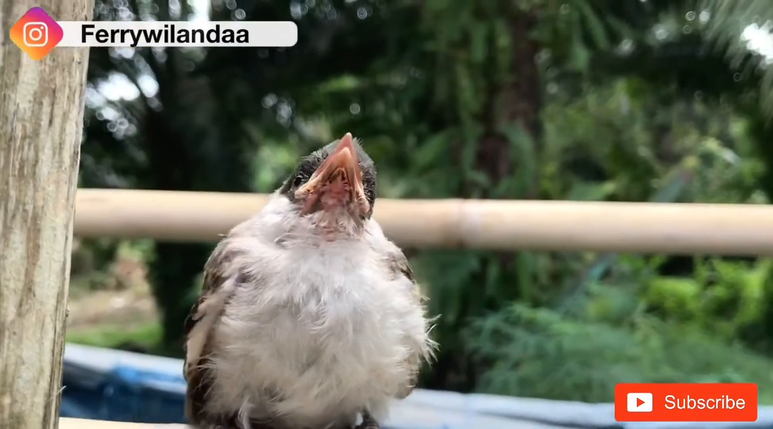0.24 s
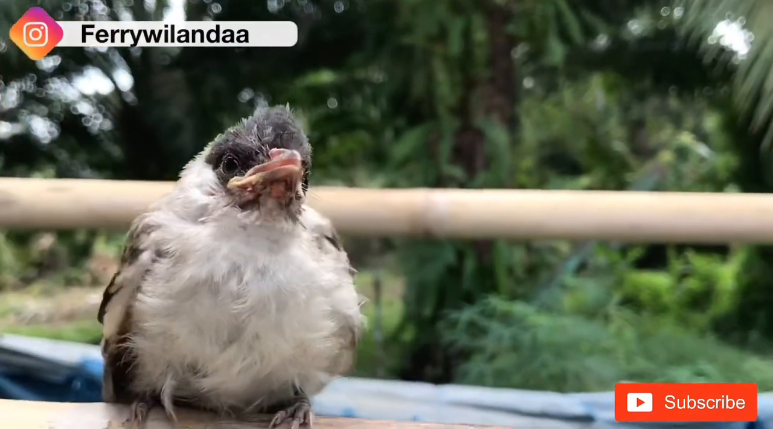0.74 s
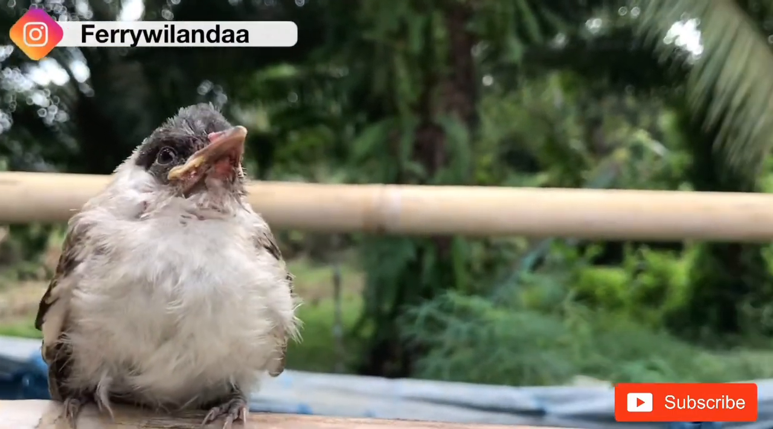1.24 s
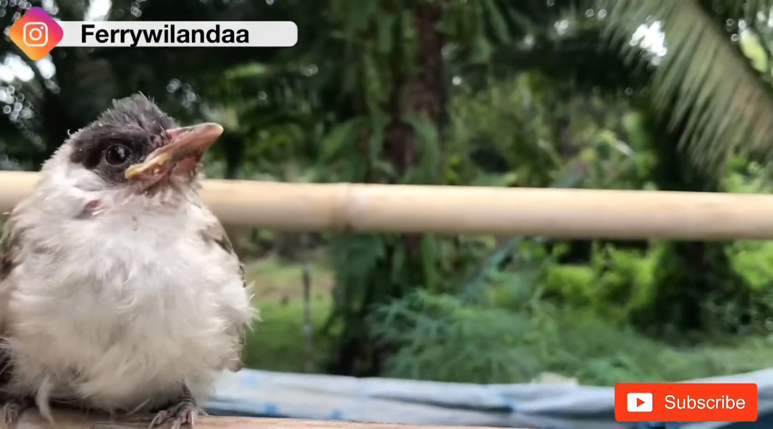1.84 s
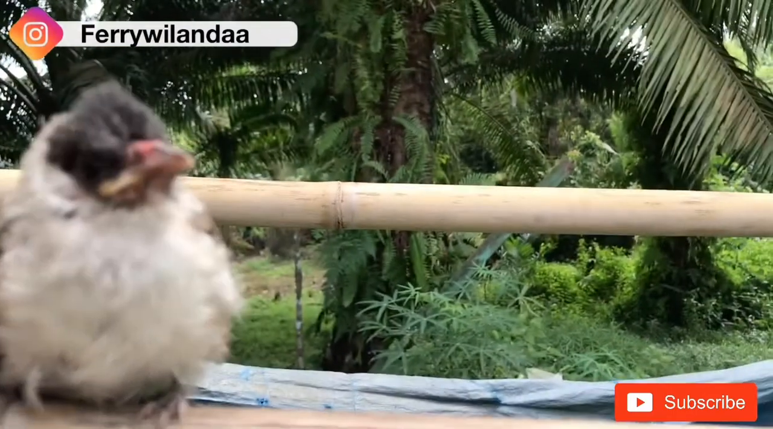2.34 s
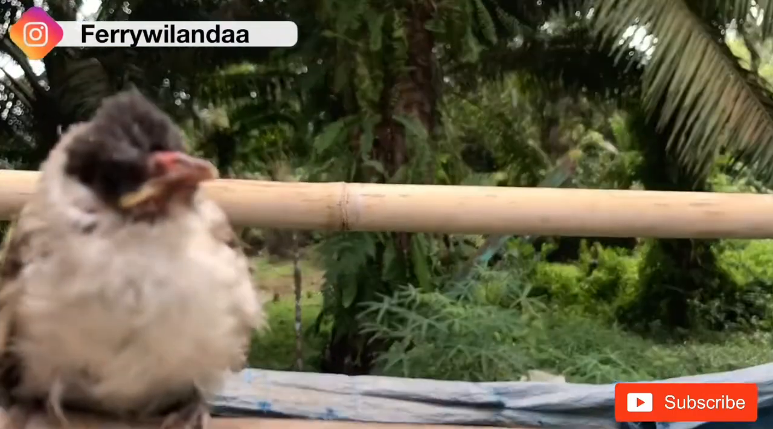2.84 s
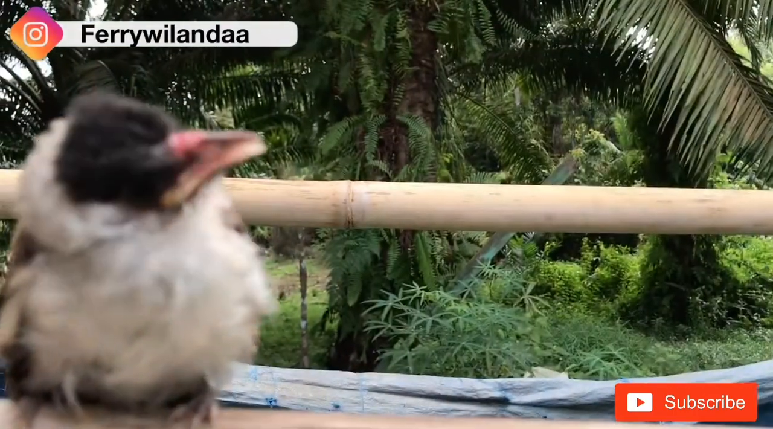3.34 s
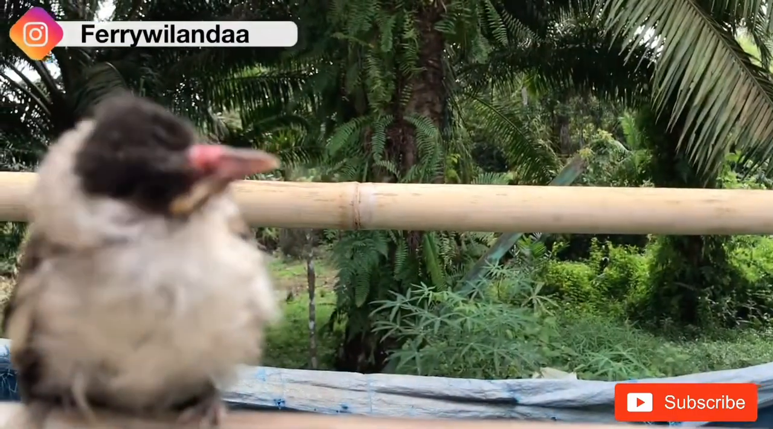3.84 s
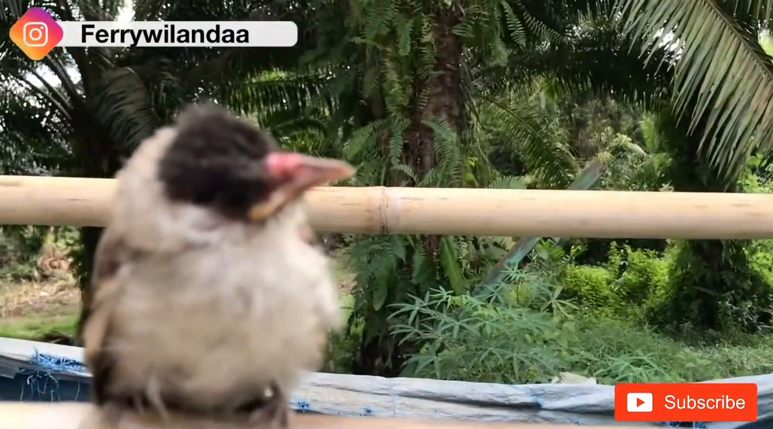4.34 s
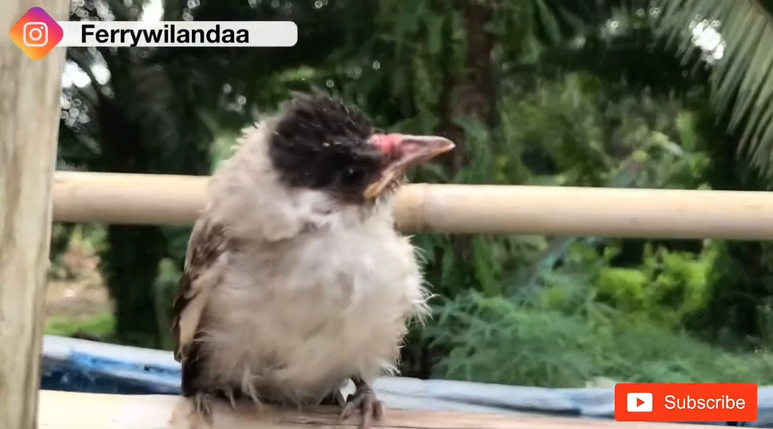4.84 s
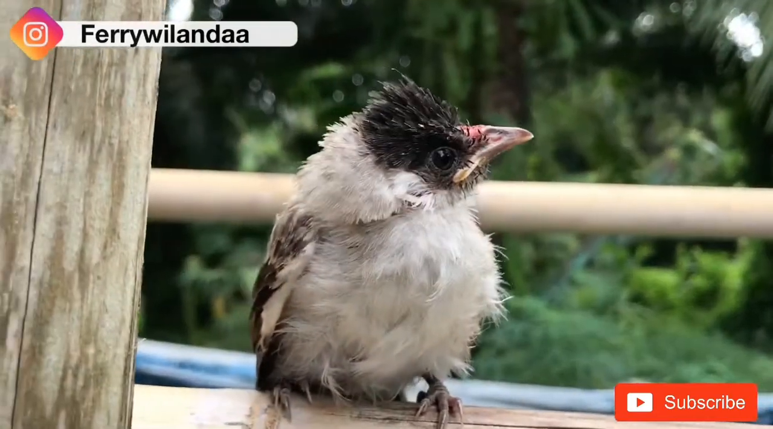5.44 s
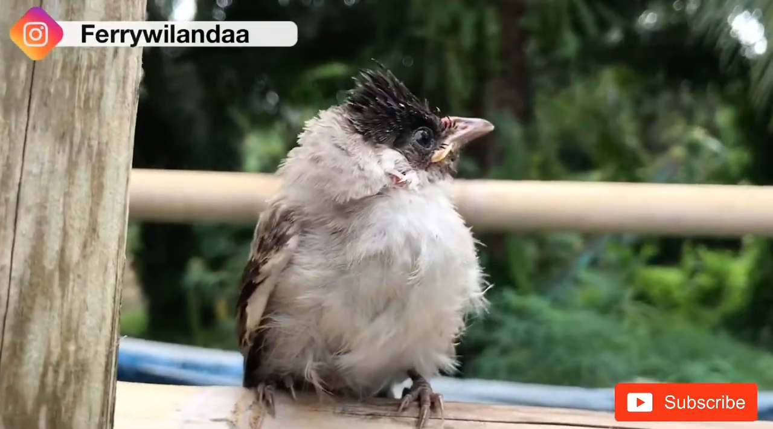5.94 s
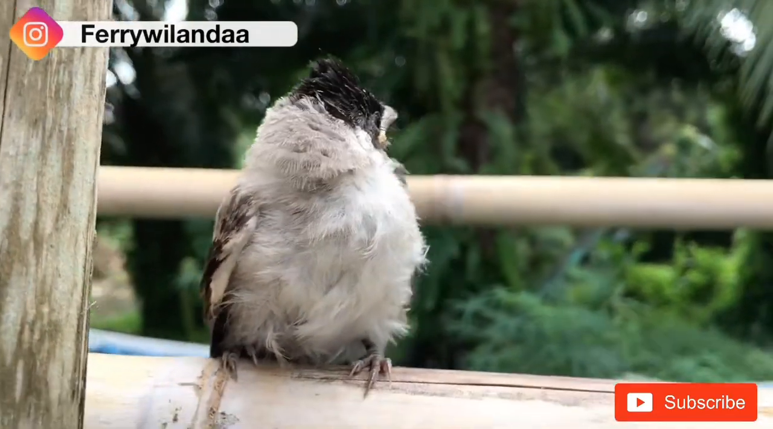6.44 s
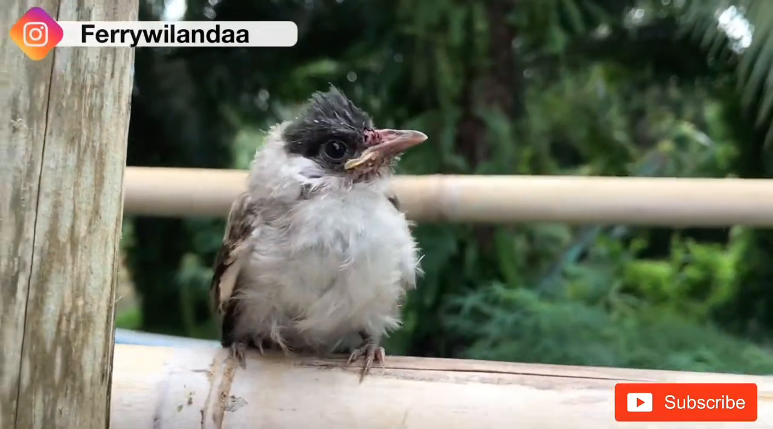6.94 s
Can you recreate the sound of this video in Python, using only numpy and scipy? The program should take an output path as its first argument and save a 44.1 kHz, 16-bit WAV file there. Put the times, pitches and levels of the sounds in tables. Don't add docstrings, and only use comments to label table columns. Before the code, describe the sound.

A close, dry recording of a fledgling: bright clean cheeps stand far above a quiet background, first a pair, another pair, then single calls spaced over half a second apart, a late pair, and two last singles. The paired second notes are rougher and trilled. Behind lie distant traffic rumble, surging low engine drone, cricket and katydid shimmer, small far bird whistles and light scuffs on wood, with almost no echo.

```python
import sys
import numpy as np
from scipy import signal
from scipy.fft import rfft, irfft, next_fast_len
from scipy.io import wavfile
from scipy.ndimage import uniform_filter1d

SR = 44100
rng = np.random.default_rng(int(sys.argv[2]) if len(sys.argv) > 2 else 0)


def volts(x):
    e = np.asarray(x, float) / 20
    return 10 ** e


def inscribe(sig):
    pcm = np.round(np.clip(np.atleast_2d(sig).T, -1, 1) * 32767)
    wavfile.write(sys.argv[1], SR, pcm.astype(np.int16))


N = 317079
TIME = np.arange(N) / SR
PADDED = next_fast_len(N, True)

# [f/Hz, density/dB per Hz]
AIR_SPECTRUM = [(240, -33.5), (400, -2.5), (1330, -14), (3810, -18), (4310, -18), (5030, -21.5),
                (7060, -18.5), (7750, -25), (9610, -19.5), (10500, -27), (16000, -25)]
# [f/Hz, density/dB per Hz]
TRAFFIC_SPECTRUM = [(20, -19), (35, -8), (52, -0.5), (80, -6), (170, -5.5), (330, -11.5), (420, -21),
                    (700, -33)]
# [t/s, level/dB]
RUMBLE_LEVEL = [(0.0, -47.5), (.7, -50.5), (2.0, -47), (3.6, -51.5), (5.5, -51), (7.19, -50)]
# [middle t/s, half length/s, level/dB]
TYRE_WHINE = [(1.1, 2.7, -72), (3.7, 1.8, -65.5), (7.0, 0.88, -72)]
# [middle t/s, half length/s, level/dB]
LOW_ENGINE = [(.2, 0.064, -47), (1.25, 0.1, -42.5), (1.95, 0.13, -39), (2.48, 0.034, -38.5),
              (2.78, 0.17, -40), (3.22, 0.094, -40.5), (3.7, 0.23, -38), (4.2, 0.17, -44.5),
              (4.52, 0.16, -39), (5.1, 0.1, -48), (5.8, 0.43, -70), (7.1, 0.19, -50.5)]
# [t/s, f/Hz, level/dB]
SECOND_ENGINE = [(0.0, 126, -46), (1.05, 126, -47), (1.249, 143, -47), (2.0, 145, -39.5), (3.05, 143, -53),
                 (3.2, 120, -50), (3.9, 120, -48.5), (4.05, 145, -45), (4.7, 146, -56), (4.9, 127, -49.5),
                 (6.5, 125, -60), (6.9, 150, -66), (7.19, 152, -39.5)]
# [middle t/s, half length/s, level/dB]
HIGH_ENGINE = [(.2, 0.58, -55.5), (1.15, 0.34, -50.5), (2.0, 0.44, -48.5), (3.1, 0.24, -58),
               (4.4, 0.31, -59.5), (6.25, 0.44, -54)]
# [f/Hz, width/Hz, level/dB, pulses/s, groups/s]
INSECT_CHOIRS = [(6611, 250, -80, 69, 2.5), (6822, 400, -79, -0.5, 0), (4300, 150, -87.5, 1, -3),
                 (8234, 500, -82.5, 55.5, 1), (9664, 250, -81, 79.5, 22), (11320, 600, -79.5, 0.5, 0)]
# [middle t/s, half length/s, level/dB]
KATYDID_SWELLS = [(1.2,0.9,-76.5),(2.75,.3,-71.5),(4.5,0.63,-72),(6.2,0.51,-69.5)]
# [f/Hz, level/dB]
CRICKET_STROKES = [(7000,-67),(7170,-65),(7230,-65)]
# [t/s, lag/bars]
CRICKET_DRAG = [(0,-.5),(2.2,.2),(4.3,.87),(4.8,1),(5.4,1),(6,1.35),(7.2,1.75)]
# [middle t/s, half length/s, level/dB]
SMEARED_CALL = [(5.255, .025, -72.5), (5.285, 0.033, -58.5)]
# [t/s, length/s, start f/Hz, end f/Hz, level/dB]
FAR_GLIDES = [(1.23, 0.09, 4090, 4280, -62.5), (2.113, 0.027, 2150, 1445, -62),
              (2.133, 0.031, 2100, 2570, -53.5), (2.204, 0.03, 2400, 1490, -54),
              (2.229, 0.036, 2175, 2660, -53), (2.23, 0.05, 2950, 2900, -62), (2.28, 0.04, 2900, 2950, -61),
              (2.301, 0.025, 3250, 3350, -56), (2.39, .012, 3000, 2700, -52), (2.4, .02, 3850, 3900, -55),
              (2.64, .04, 3000, 3060, -66), (2.858, 0.038, 2950, 3140, -62),
              (2.385, 0.0043, 3900, 2900, -41), (5.034, 0.014, 4500, 4120, -63),
              (5.037, 0.035, 4200, 4150, -58), (5.255, 0.031, 6310, 5500, -67.5),
              (5.27, 0.022, 5650, 5150, -61), (5.28, 0.032, 5180, 5100, -60.5),
              (5.309, 0.072, 5150, 5100, -55.5), (7.014, 0.02, 3330, 3036, -57.5),
              (7.044, 0.019, 2250, 1860, -56.5), (7.061, 0.016, 1900, 2250, -62),
              (7.122, .014, 2900, 2410, -62), (7.136, 0.024, 2200, 1840, -58),
              (7.158, 0.029, 2200, 2150, -56)]
# [t/s, f/Hz, level/dB]
FAR_REPEATS = [(2.27, 2390, -65), (2.39, 2420, -56), (2.455, 2380, -57), (2.65, 2310, -59.5),
               (2.72, 2320, -64), (2.795, 2390, -56), (2.88, 2430, -57), (2.99, 2420, -59.5),
               (3.0, 2270, -65), (3.065, 2495, -57.5), (3.11, 2470, -63), (3.18, 2350, -60),
               (3.32, 2430, -64), (3.41, 2294, -62.5), (3.49, 2350, -68), (3.54, 2420, -67),
               (3.61, 2310, -60.5), (3.7, 2330, -65.5), (3.83, 2280, -60.5), (3.95, 2320, -66),
               (4.05, 2322, -58), (4.15, 2310, -63), (4.28, 2260, -61), (4.35, 2210, -61.5),
               (5.14, 2310, -67), (6.955, 2320, -61.5), (7.06, 2365, -62)]
# [middle t/s, half length/s, level/dB]
FAR_THREAD = [(3.3, 1, -68.5), (5.16, 0.061, -67), (7.1, 0.12, -70)]
# [t/s, rise/s, fall/s, centre f/Hz, level/dB]
RAIL_RUSTLES = [(.26, 0.0018, 0.013, 2150, -53), (.27, 0.012, 0.038, 801, -50.5),
                (1.11, 0.0016, 0.0092, 3935, -53.5), (1.769, 0.00112, 0.083, 888, -44),
                (1.776, 0.00433, 0.12, 2638, -55), (1.861, 0.038, 0.072, 3510, -50.5),
                (1.88, 0.0338, 0.056, 8410, -52), (2.224, .002, .01, 3500, -60),
                (2.3, 0.0019, 0.17, 3454, -60), (2.33, .02, 0.022, 3500, -65.5),
                (1.19, 0.021, 0.035, 3500, -57), (1.82, .005, .02, 4500, -60.5),
                (2.34, 0.0022, 0.013, 8040, -56), (2.386, 0.0012, 0.012, 4967, -54.5),
                (2.42, 0.016, 0.081, 5433, -56.5), (3.53, 0.011, 0.064, 4950, -60),
                (4.071, 0.0054, .02, 7935, -60), (4.131, 0.024, 0.09, 5955, -56.5),
                (4.38, 0.00188, 0.0114, 4415, -52.5), (5.908, 0.0019, 0.0089, 4000, -55)]
# [t/s, start f/Hz, level/dB, octave over it/dB, length/s]
SYRINX_CATCHES = [(0.492, 3100, -27.5, -19.5, 0.012), (0.6933, 3160, -26.5, -1, 0.012),
                  (1.3279, 3630, -23.5, -32.5, 0.012), (1.4967, 3090, -28, 8, 0.004),
                  (2.487, 3690, -29.5, -26, 0.013), (3.2455, 3400, -28.5, -14, 0.0115),
                  (3.868, 3160, -30, -21, 0.014), (4.6635, 3160, -29, -24, 0.011),
                  (5.4375, 3140, -30.5, -21.5, 0.014), (5.5675, 3150, -26.5, 2, 0.0056),
                  (6.297, 3130, -33, -15, 0.01), (6.711, 3350, -32, -27, 0.014)]
# [t/s, length/s, plateau f/Hz, closing f/Hz, 2nd partial level/dB]
CALLS = [(0.504, 0.068, 1476, 1618, -19.5), (0.702, 0.07, 1335, 1281, -23), (1.34, 0.064, 1549, 1772, -19),
         (1.503, 0.07, 1319, 1269, -24), (2.502, 0.064, 1594, 1882, -16), (3.257, 0.069, 1492, 1625, -19.5),
         (3.881, 0.065, 1532, 1702, -19), (4.676, 0.073, 1498, 1599, -20), (5.45, 0.071, 1475, 1649, -21.5),
         (5.574, 0.06, 1298, 1265, -23), (6.308, 0.068, 1410, 1622, -22.5), (6.725, 0.068, 1612, 1726, -19)]
# [4th partial early/dB, 4th late/dB, upper partials/dB]
CALL_BEAKS = [(1, 13.5, -24), (5.5, 3.5, -11.5), (4, 3, -19.5), (13.5, 12, -11), (-3.5, -10.5, -26),
              (5.5, 4.5, -21), (2.5, 0, -22.5), (5, 9, -18.5), (2, 4, -19), (5.5, 1, -13), (-3, -6.5, -24),
              (-2, 4.5, -22)]
# [slide-up share, overshoot share, climb start/s, climb stop before the end/s]
CALL_BENDS = [(0.11, .005, 0.018, 0.018), (0.06, 0.0099, 0.008, 0.02), (0.07, 0.039, .024, 0.0066),
              (0.07, 0.0078, 0.03, .012), (0.098, .03, 0.01413, 0.0035), (.14, 0.017, .024, 0.02),
              (0.14, 0.024, 0.022, 0.0091), (0.15, 0.018, .016, 0.0075), (0.11, 0.012, 0.023, 0.0088),
              (.06, 0.01, .016, .008), (0.13, 0.048, 0.02, .008), (0.11, .03, 0.03, 0.0073)]
# [swell/dB, release/dB, loss as the beak opens/dB]
CALL_BREATHS = [(0.2,-2.5,2.5),(-0.5,-1.5,15.5),(1.5,2,-1.4),(1.4,1.1,16),(-0.1,1,4.5),(0.5,-0.5,-3),(0.8,8.5,14),(-2.5,4,7),(-0.1,5,2),(-1.8,6,6),(0.5,4.5,-5.54),(-2,-0.5,12)]
# [t/s, rise/Hz, width/ms]
TRILL_FLICKS = [(0.7127, 41, 2.1), (0.7209, 126, 1.4), (0.7252, -46, 0.9), (0.7276, 136, 1.7),
                (0.7337, 116, 1.3), (0.7399, 195, 1.7), (0.7468, 142, 1.4), (0.7536, 189, 1.4),
                (0.7606, -37, 2.2), (0.77, 60, 1.6), (1.5125, 59, 0.9), (1.5174, 190, 1.5),
                (1.5231, 331, 1.5), (1.53, 293, 1.5), (1.5345, -86, 0.9), (1.5365, 181, 1.8),
                (1.5435, 241, 1.4), (1.5504, 367, 1.6), (1.5576, 236, 1.5), (1.5622, -34, 1.0),
                (1.5693, 272, 2.2), (5.5802, 102, 2.1), (5.5846, 272, 1.3), (5.5908, 400, 1.5),
                (5.5974, 400, 1.4), (5.602, -65, 0.9), (5.6058, 262, 1.2), (5.6117, 384, 1.4),
                (5.6165, -148, 1.0), (5.6206, 356, 2.0), (5.6224, -200, 1.7)]
# [t/s, rise/Hz, width/ms]
PITCH_WAVERS = [(0.5064, 36, 0.9), (0.5212, 13, 3.5), (0.531, -11, 2.6), (0.548, 13, 4.0),
                (0.5657, -17, 1.2), (0.575, 69, 3.6), (1.3411, -44, 0.9), (1.3454, -33, 1.1),
                (1.355, -33, 1.4), (1.364, 30, 0.9), (1.3794, 51, 1.9), (1.3914, 28, 1.7), (1.402, 35, 1.5),
                (2.5128, 191, 2.7), (2.5135, -126, 1.4), (2.5219, 85, 1.1), (2.5265, 45, 1.0),
                (2.5322, 102, 1.1), (2.5441, 91, 1.1), (2.558, 35, 1.5), (3.2599, 31, 0.9),
                (3.268, 29, 0.9), (3.2768, 22, 1.3), (3.2936, 21, 1.4), (3.3046, -23, 1.5),
                (3.3139, 15, 2.3), (3.8903, 66, 0.9), (3.8948, 44, 0.9), (3.9007, 90, 1.1),
                (3.9042, -33, 0.9), (3.9167, 74, 1.1), (3.9228, 35, 0.9), (3.929, 30, 1.2),
                (4.6803, 21, 1.5), (4.6866, -14, 4.0), (4.6871, 40, 0.9), (4.696, 32, 1.0),
                (4.7001, -18, 4.0), (4.7102, -11, 1.4), (5.4573, -29, 1.5), (5.4628, -21, 0.9),
                (5.4827, -18, 3.4), (5.4935, 14, 1.0), (5.5109, -18, 2.6), (6.3181, -50, 1.8),
                (6.3259, 27, 2.3), (6.3456, 38, 1.1), (6.3507, 67, 1.9), (6.3672, -35, 0.9),
                (6.3725, 57, 1.4), (6.7275, -25, 3.5), (6.7332, 64, 2.0), (6.7394, -43, 0.9),
                (6.7508, -23, 0.9), (6.7578, 19, 1.8), (6.7678, -14, 4.0), (6.789, 35, 1.4)]
# [t/s, level/dB, width/ms]
BREATH_PUSHES = [(.555, -2, 5), (.74, 1.5, 2.5), (.754, -1, 4.2), (1.36, -0.5, 2), (1.385, 0, 4.7),
                 (1.518, 1, 2), (1.537, -2, 2), (1.565, -3, 3.4), (2.525, -1, 1.3), (2.545, 0.5, 4),
                 (3.27, 0, 4), (3.91, 0.5, 4), (3.918, 1, 1.5), (4.72, 0.5, 5.2), (5.485, 1, 5),
                 (5.585, 2, 2.1), (5.598, 0, 1.8), (5.62, -1, 2.7), (6.33, 0.5, 5.6), (6.348, 1.5, 4),
                 (6.735, 0.5, 3.7)]
# [multiple, level under the 2nd/dB, gain per 200 Hz of pitch/dB]
ODD_PARTIALS = [(1, -22.5, -0.5), (3, -24, 5.5)]
# [multiple, level in the group/dB]
UPPER_PARTIALS = [(5, -11.5), (6, -3), (7, -8), (8, -2), (9, -17), (10, -10.5), (11, -18)]
# [f/Hz, width/Hz]
VOCAL_RESONANCES = [
    (3200, 2600),
    (6050, 1500),
]
# [f/Hz, level/dB]
OPEN_BEAK = [(6500, 6.5), (8000, 1.5), (9500, -2.5), (10500, -7), (12000, 3), (13200, -7.5), (14500, -6.5),
             (15600, 1.5), (17000, -1)]

SCOOP_S = .013
ATTACK_S, ATTACK_DB, SWELL_DB, RELEASE_S, RELEASE_DB = 0.015, 8.5, 0.7, .02, 15.5
OPEN_S, OPEN_DB, SHUT_S, SHUT_DB = .017, 25, 0.03, 10


def rms_one(x):
    return x / np.sqrt(np.mean(x ** 2) + 1e-20)


def drift(rate):
    r = np.exp(-2 * np.pi * rate / SR)
    return rms_one(signal.lfilter([1], [1, -2 * r, r * r], rng.standard_normal(N + SR))[SR:])


def coloured(spectrum):
    hz, db = np.transpose(spectrum)
    grid = np.arange(PADDED // 2 + 1) * SR / PADDED + 1
    gain = volts(np.interp(np.log(grid), np.log(hz), db, left=-70, right=-70))
    return rms_one(irfft(rfft(rng.standard_normal(PADDED)) * gain, PADDED)[:N])


def narrow(hz, width_hz):
    r = np.exp(-np.pi * width_hz / SR)
    a = [1, -2 * r * np.cos(2 * np.pi * hz / SR), r * r]
    once = signal.lfilter([1, 0, -1], a, rng.standard_normal(N))
    return rms_one(signal.lfilter([1, 0, -1], a, once))


def resonance(hz, centre_hz, width_hz):
    return 1 / np.sqrt(1 + (2 * (hz - centre_hz) / width_hz) ** 2)


def hum(hz, waver_hz):
    return np.sqrt(2) * np.sin(2 * np.pi * np.cumsum(hz + waver_hz * drift(4)) / SR)


def surges(rows, steep):
    return sum(volts(db) * np.exp(-np.abs((TIME - s) / half) ** steep) for s, half, db in rows)


def bumps(rows):
    out = np.zeros(N)
    for s, height, width_ms in rows:
        at = slice(round((s - .015) * SR), round((s + .015) * SR))
        out[at] += height * np.exp(-.5 * (1000 * (TIME[at] - s) / width_ms) ** 2)
    return out


def ramp(t, length):
    return np.clip(1 - t / length, 0, 1) ** 2


def air():
    return volts(-57) * coloured(AIR_SPECTRUM)


def traffic():
    rumble = volts(np.interp(TIME, *np.transpose(RUMBLE_LEVEL)) + 5.0) * coloured(TRAFFIC_SPECTRUM)
    return rumble + volts(-3.5) * surges(TYRE_WHINE, steep=4.3) * narrow(965, 160)


def engines():
    s, second_hz, second_db = np.transpose(SECOND_ENGINE)
    low = volts(-4.0) * surges(LOW_ENGINE, steep=3.9) * hum(102, 3.32)
    second = volts(np.interp(TIME, s, second_db) - 3.5) * hum(np.interp(TIME, s, second_hz), 2.5)
    upper = narrow(334, 13.0) + 0.84 * narrow(303.5, 3.0) + .5 * narrow(352, 6.1)
    return low + second + volts(-0.5) * surges(HIGH_ENGINE, steep=3.2) * upper


def insects():
    out = np.zeros(N)
    for hz, width_hz, db, pulses, groups in INSECT_CHOIRS:
        pulse = (1.0 + np.sin(2 * np.pi * pulses * TIME + .5 * drift(3))) ** (2 if pulses else 0)
        group = 1 + .9 * np.sin(2 * np.pi * groups * TIME + 1.4)
        out += volts(db + 0.3 * drift(1.0)) * rms_one(pulse * group) * narrow(hz, width_hz)
    return out


def katydid():
    return surges(KATYDID_SWELLS, steep=3.0) * narrow(4330, 130)


def cricket():
    bars_per_s, stroke_s, stroke_width_s = 19.4, .0118, .0022
    bar = bars_per_s * TIME - np.interp(TIME, *np.transpose(CRICKET_DRAG))
    beat_s = ((bar + .5) % 1 - .5) / bars_per_s
    turns = np.cumsum(1 + .012 * drift(30)) / SR
    strokes = np.zeros(N)
    for k, (hz, db) in enumerate(CRICKET_STROKES):
        shape = np.exp(-.5 * ((beat_s - (k - 1) * stroke_s) / stroke_width_s) ** 2)
        strokes += volts(db) * shape * np.sin(2 * np.pi * hz * turns)
    return volts(3 + 1.5 * drift(15)) * strokes


def smeared_call():
    return surges(SMEARED_CALL, steep=2.5) * narrow(5900, 1300)


def far_birds():
    out, blur, warble = np.zeros(N), .85 + .3 * drift(90), 1 + .007 * drift(25)
    repeats = [(s, 0.048, hz, hz - 50, db) for s, hz, db in FAR_REPEATS]
    for s, length, start_hz, end_hz, db in FAR_GLIDES + repeats:
        at = slice(round(s * SR), round((s + length) * SR))
        part = (TIME[at] - s) / length
        hz = (start_hz + (end_hz - start_hz) * part) * warble[at]
        whistle = np.sin(2 * np.pi * np.cumsum(hz) / SR)
        out[at] += np.sqrt(2) * volts(db) * np.sin(np.pi * np.clip(part, 0, 1)) * whistle
    thread = surges(FAR_THREAD, steep=3.2) * volts(1.4 * drift(27)) * narrow(2306, 300)
    return out * blur + thread


def garden(x):
    t60_s = 0.23
    t = TIME[:SR // 2]
    tail = rng.standard_normal(len(t)) * volts(-60 * t / t60_s) * np.clip(t / 0.0053, 0, 1)
    tail = signal.lfilter([1], [1, -.4], tail)
    return signal.fftconvolve(x, tail / np.sqrt(np.sum(tail ** 2)))[:N]


def rustles():
    out, grain = np.zeros(N), rng.standard_normal(N) * volts(1.7 * drift(150))
    for s, rise, fall, hz, db in RAIL_RUSTLES:
        at = slice(max(round((s - .2) * SR), 0), round((s + 0.58) * SR))
        t = TIME[at] - s
        shape = np.where(t < 0, np.exp(-(t / rise) ** 2), np.exp(-np.abs(t) / fall))
        band = signal.butter(2, [hz / 2.3, min(hz * 1.9, .45 * SR)], "band", fs=SR)
        out[at] += volts(db) * shape * rms_one(signal.lfilter(*band, grain[at]))
    return out


def catches():
    out, rasp = np.zeros(N), narrow(3010, 2000) + 0.28 * narrow(6006, 2300)
    for s, start_hz, db, octave_db, length in SYRINX_CATCHES:
        at = slice(round(s * SR), round((s + 2.3 * length) * SR))
        t = TIME[at] - s - .002
        part = np.clip(t / (1.1 * length), 0, 1)
        phase = 2 * np.pi * np.cumsum(start_hz - 650 * part) / SR
        stutter = .65 - 0.46 * np.cos(2 * np.pi * t / 0.0041)
        tone = np.sin(phase) + volts(octave_db) * np.sin(2 * phase)
        blip = tone * (1 - part) ** 2.5 * stutter
        out[at] += volts(db) * np.sin(np.pi * part ** 0.96) * (2.4 * blip + 0.8 * part * rasp[at])
    return out


def gesture(t, call, mouth, bend, push):
    length, plateau_hz, closing_hz, db = call
    early_db, late_db, upper_db = mouth
    scoop, overshoot, climb_from, climb_ends = bend
    swell_db, release_db, open_db = push
    left = length - t
    climb = np.clip((t - climb_from) / (length - climb_ends - climb_from), 0, 1)
    slide = np.clip(1 - t / SCOOP_S, 0, 1)
    hz = plateau_hz * (1 - scoop * slide + overshoot * np.exp(-((t - SCOOP_S) / 0.0047) ** 2))
    hz += (closing_hz - plateau_hz) * np.sin(climb * 1.1) / np.sin(1.1)
    level_db = db - ATTACK_DB * ramp(t, ATTACK_S) + (SWELL_DB + swell_db) * climb
    level_db -= (RELEASE_DB + release_db) * ramp(left, RELEASE_S)
    brighten_db = (late_db - early_db) * climb
    fourth_db = early_db + brighten_db - SHUT_DB * ramp(left, SHUT_S)
    fourth_db -= (OPEN_DB * scoop / 0.17 + open_db) * ramp(t, OPEN_S)
    high_db = upper_db + brighten_db + climb - 3.3 * ramp(t, OPEN_S) - 4.0 * ramp(left, SHUT_S)
    return [uniform_filter1d(curve, size=60) for curve in (hz, level_db, fourth_db, high_db)]


def chick():
    out, wobble, rough, breath = np.zeros(N), drift(400), drift(300), rng.standard_normal(N)
    flicks, wavers, pushes_db = bumps(TRILL_FLICKS), bumps(PITCH_WAVERS), bumps(BREATH_PUSHES)
    hoarseness = rms_one(uniform_filter1d(breath, size=16))
    slow_flicks = uniform_filter1d(flicks, size=SR // 140)
    throat_res, beak_res = VOCAL_RESONANCES
    for (s, *call), mouth, bend, push in zip(CALLS, CALL_BEAKS, CALL_BENDS, CALL_BREATHS):
        length = call[0]
        at = slice(round((s - .004) * SR), round((s + length + .007) * SR))
        t = TIME[at] - s
        flick, slow, rasp, push_db = flicks[at], slow_flicks[at], rough[at], pushes_db[at]
        base, level_db, fourth_db, high_db = gesture(np.clip(t, 0, length), call, mouth, bend, push)
        hz = (base + flick + wavers[at]) * (1 + (.002 + slow / 60000) * wobble[at])
        phase = 2 * np.pi * np.cumsum(hz) / SR
        mean_hz = base + slow
        throat = resonance(2 * hz, *throat_res) / resonance(2 * mean_hz, *throat_res)
        beak = (resonance(4 * hz, *beak_res) / resonance(4 * mean_hz, *beak_res)) ** 2.2

        hiss = (.018 + slow / 5000) * hoarseness[at] * np.sin(4.4 * phase)
        voice = throat * np.sin(2 * phase)
        voice += beak * volts(fourth_db + push_db) * (np.sin(4 * phase) + hiss)
        voice *= volts(push_db)
        voice *= volts(0.011 * (flick - slow))
        voice *= 1 + (.03 + slow / 6000) * rasp

        settled = np.clip((t + .002) / 0.012, 0, 1)
        ending = np.clip((length + .001 - t) / .002, 0, 1)
        effort_db = level_db + 28.5
        odd_db = -.65 * (level_db - level_db.max()) - .3 * effort_db.max() + 1.4 * rasp
        odd = 0
        for k, db, slope_db in ODD_PARTIALS:
            odd = odd + volts(db + slope_db * (mean_hz - 1500) / 200) * np.sin(k * phase + k)
        voice += settled * ending * volts(odd_db) * odd

        upper = 0
        for k, db in UPPER_PARTIALS:
            gape_db = np.interp(k * hz, *np.transpose(OPEN_BEAK))
            upper = upper + settled ** (1.5 * (k % 2)) * volts(db + gape_db) * np.sin(k * phase + k * k)
        second_half = np.clip(t / length * 2 - 1, 0, 1)
        upper *= (1 + .3 * rasp) * volts(-9 * second_half ** 2 * (hz - 1300) / 400)
        upper *= volts(0.35 * effort_db)
        airy = np.diff(breath[at], prepend=0) * (0.059 + np.abs(slow) / 600)
        voice += volts(high_db) * (upper + airy)

        if flick.max() > 180:
            voice *= volts(-10 * ramp(np.maximum(length + .002 - t, 0), 0.029))
        edge = np.clip(np.minimum((t - t[0]) / .007, (t[-1] - t) / .009), 0, 1) ** 1.5
        out[at] += np.sqrt(2) * volts(level_db) * edge * voice
    return out


def scene():
    background = air() + traffic() + engines() + insects() + katydid() + cricket() + smeared_call()
    far, near = far_birds(), catches() + chick()
    echoes = garden(volts(-33) * near + .3 * far)
    mono = background + far + echoes + rustles() + near
    return np.array([mono, mono])


def top_cut(x):
    return signal.sosfilt(signal.butter(12, 16430, fs=SR, output="sos"), x)


def record(dry):
    hz = np.arange(PADDED // 2 + 1) * SR / PADDED
    gain = (hz < 15850) / np.sqrt(1 + (35 / (hz + 1)) ** 8)
    mix = irfft(rfft(dry, PADDED) * gain, PADDED)[:, :N]
    return top_cut(mix)


dry = scene()
out = record(dry)
inscribe(out)
```